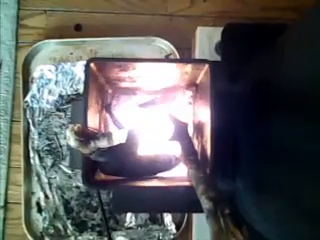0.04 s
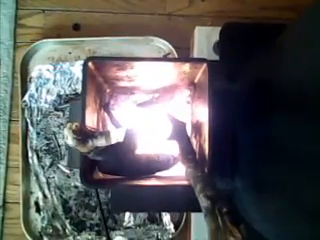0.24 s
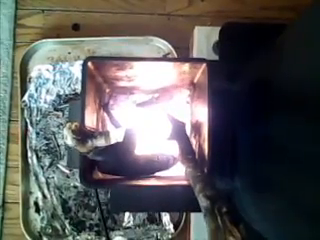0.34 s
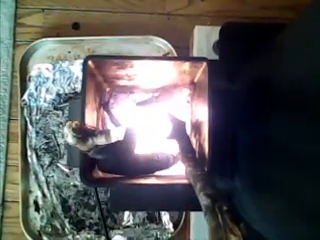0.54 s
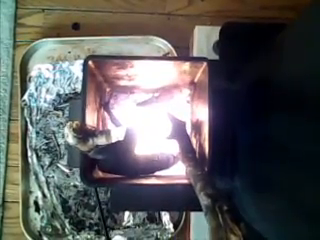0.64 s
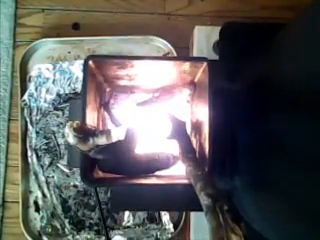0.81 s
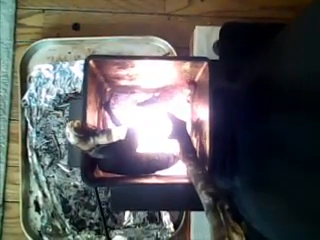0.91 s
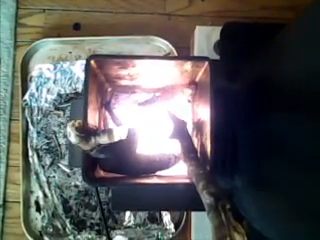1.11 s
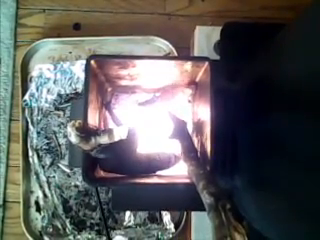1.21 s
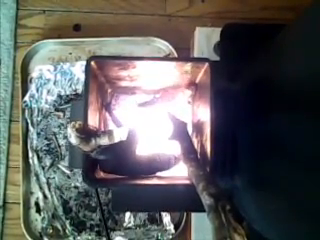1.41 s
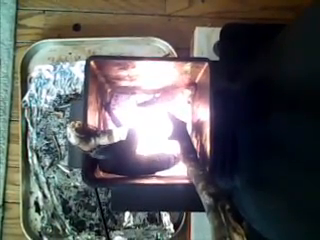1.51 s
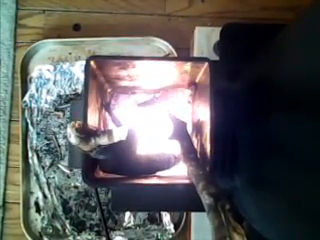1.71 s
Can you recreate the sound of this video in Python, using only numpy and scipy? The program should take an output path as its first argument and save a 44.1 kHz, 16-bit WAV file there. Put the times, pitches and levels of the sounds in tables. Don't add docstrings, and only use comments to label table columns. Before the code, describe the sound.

Close, mono, slightly dull microphone in a room: near silence with hiss, a click opens onto a rushing stove fire, two rattling plastic knocks follow quickly, then steady draft roar, a tiny spit and a soft thud.

```python
import sys
import numpy as np
from scipy import signal
from scipy.fft import rfft, irfft, next_fast_len
from scipy.io import wavfile
from scipy.ndimage import uniform_filter1d, map_coordinates

SR = 44100
rng = np.random.default_rng(int(sys.argv[2]) if len(sys.argv) > 2 else 0)


def gain_from_decibels(decibels):
    exponent = np.asarray(decibels, float) / 20
    return 10 ** exponent


def generate_wav(signal):
    frames = np.transpose(np.atleast_2d(signal))
    scaled = np.clip(frames, -1, 1) * 32767
    pcm = np.round(scaled).astype(np.int16)
    wavfile.write(sys.argv[1], SR, pcm)


N = 77175
T = np.arange(N) / SR
OPEN_S = 0.1795


def unit(x):
    return x / np.sqrt(np.mean(x ** 2) + 1e-20)


def filtered(x, response):
    m = next_fast_len(N + SR)
    return irfft(rfft(x, m) * response(np.fft.rfftfreq(m, 1 / SR)), m)[:N]


def wobble(rate):
    knots = rng.standard_normal(int(N * 60 / SR) + 4)
    return map_coordinates(knots, [T * min(rate, 59)])


def rush(colour, patchy_db):
    z = signal.stft(rng.standard_normal(N), nperseg=512)[2]
    field = uniform_filter1d(rng.standard_normal(z.shape), size=5, axis=0)
    field = uniform_filter1d(field, size=8, axis=1)
    noise = signal.istft(z * gain_from_decibels(patchy_db * unit(field)), nperseg=512)[1][:N]
    f, db = np.transpose(colour)

    def response(hz):
        return gain_from_decibels(np.interp(np.log(hz + 1), np.log(f + 1), db, left=-120, right=-120))
    return unit(filtered(noise, response))


def burst(s, rise, t60):
    u = np.clip(T - s, 0, None)
    return (1 - np.exp(-u / rise)) * gain_from_decibels(-60 * np.clip(u - rise, 0, None) / t60)


def ring(s, hz, db, t60, rise=0.0038):
    return gain_from_decibels(db) * burst(s, rise, t60) * np.sin(2 * np.pi * hz * (T - s))


def microphone_noise():
    # (frequency [Hz], density [dB per Hz])
    hiss_colour = [(70, -10), (160, 3.5), (400, -10.5), (1000, -4.5), (1600, -13.5), (9500, -16.5),
                   (11500, -18)]
    # (frequency [Hz], level [dB])
    whine_tones = [(4125, -79), (157, -84)]
    hiss = gain_from_decibels(-74) * rush(hiss_colour, patchy_db=.5)
    pulse_s = .069
    on = np.clip(3 * np.sin(2 * np.pi * (T - .007) / pulse_s) + .6, 0, 1)
    whine = sum(gain_from_decibels(db) * np.sin(2 * np.pi * hz * T) for hz, db in whine_tones)
    return hiss + on * whine


def opening_click():
    # (time after opening [s], frequency [Hz], level [dB], t60 [s])
    click_modes = [
        (0, -1000, -31, .03),
        (0, -700, -34, .02),
        (.004, -1080, -33, .025),
    ]
    rings = sum(ring(OPEN_S + s, *mode, rise=.0001) for s, *mode in click_modes)
    return rings - gain_from_decibels(-25) * burst(OPEN_S, .0002, .15)


def fan_tones():
    # (frequency [Hz], width [Hz], level [dB])
    fan_modes = [(79.6, 6.6, -11.5), (160.9, 19.5, -7), (190.7, 14.3, -13), (292.3, 7.2, -22.5),
                 (364.5, 6.9, -17.5), (562.2, 13.5, -15.5), (717, 19, -16), (1004.7, 28, -13),
                 (7500, 40, -38), (7500, 40, -36), (9290, 280, -26.5)]

    def tone(hz, width_hz):
        def response(f):
            peak = 1j * f * width_hz / (hz * hz - f * f + 1j * f * width_hz)
            return peak ** 2
        return unit(filtered(rng.standard_normal(N), response))
    return sum(gain_from_decibels(db) * tone(hz, width_hz) for hz, width_hz, db in fan_modes)


def draft_roar():
    # (time [s], level [dB])
    draft = [(.18, -39), (.45, -40.5), (.6, -43), (.9, -44), (1.2, -42.5), (1.5, -42), (1.62, -41.5),
             (1.69, -41), (1.75, -39.5)]
    # (frequency [Hz], density [dB per Hz])
    roar_colour = [(170, 2), (230, -1), (430, -4.5), (560, -1), (1050, -0.5), (1500, -7), (2300, -10.5),
                   (2800, -21.5), (3600, -49)]
    fizz_colour = [(2200, -39), (3000, 2), (3300, -2), (3800, 0), (4700, -2.5), (5300, -7), (8300, -7.5),
                   (9300, -7.5), (11500, -13)]
    rumble_colour = [(2.4, -14), (4.0, 18), (16, 6.5), (81, -9), (118, -3.5), (165, -3.5), (260, -25),
                     (340, -6), (570, -120)]
    draft_db = np.interp(T, *np.transpose(draft))
    flutter_db = .45 * wobble(9)
    roar = gain_from_decibels(flutter_db + .8 * wobble(35)) * rush(roar_colour, patchy_db=.9)
    fizz = gain_from_decibels(-17 + flutter_db) * rush(fizz_colour, patchy_db=-1.7)
    rumble_db = 4 - 1.26 * (draft_db - draft_db.mean()) + 1.4 * wobble(6.2)
    rumble = gain_from_decibels(rumble_db) * rush(rumble_colour, patchy_db=-1.16)
    return gain_from_decibels(draft_db) * (roar + fizz + rumble + fan_tones())


def flue_throb():
    # (time [s], pitch [Hz], level [dB], octave level [dB])
    flue = [(0.6, 79.6, -51.5, -59), (0.676, 80.0, -63, -67), (0.794, 80.05, -51.5, -46),
            (0.82, 79.8, -55, -66), (0.92, 79.4, -58, -56), (1.054, 80.96, -49, -61),
            (1.09, 81.13, -46.5, -42.5), (1.226, 83.05, -60, -54), (1.288, 82.6, -46.5, -80),
            (1.314, 81.44, -50.5, -56), (1.576, 78.3, -48, -52), (1.634, 75.04, -50.5, -59),
            (1.652, 75.1, -48, -46), (1.75, 74.7, -46.5, -66)]
    s, hz, db, octave_db = np.transpose(flue)
    phase = 2 * np.pi * np.cumsum(np.interp(T, s, hz)) / SR
    pitch = gain_from_decibels(np.interp(T, s, db)) * np.sin(phase)
    octave = gain_from_decibels(np.interp(T, s, octave_db)) * np.sin(2 * phase)
    return gain_from_decibels(8.5) * (pitch + octave)


def rattle(contacts, body_colour, bright_colour):
    body = sum(gain_from_decibels(db) * burst(s, rise, t60) for s, rise, db, _, t60 in contacts)
    bright = sum(gain_from_decibels(db) * burst(s, rise, 0.8 * t60) for s, rise, _, db, t60 in contacts)
    body = body * gain_from_decibels(1.1 * wobble(53.2)) * rush(body_colour, patchy_db=-1.0)
    return body + bright * rush(bright_colour, patchy_db=1.5)


def knocks():
    # (time [s], rise [s], body level [dB], bright level [dB], t60 [s])
    first = [
        (.2428, 0.00092, -49, -34.5, .12),
        (.2452, 0.0011, -31.5, -41, 0.095),
        (.255, 0.0038, -30, -43.5, 0.77),
        (0.282, 0.0026, -37, -59, .15),
    ]
    second = [
        (.371, 0.0027, -30, -43.5, 0.26),
        (.3785, 0.0023, -30, -47.5, 0.25),
    ]
    # (frequency [Hz], density [dB per Hz])
    first_body = [(110, -10), (200, -11.5), (350, 0.5), (480, -5), (1010, -1.5), (1600, -10), (2300, -12),
                  (3000, -25.5), (3800, -24)]
    first_bright = [(2500, -24), (3000, -3), (3500, -7.5), (3900, 2.5), (4800, -1.5), (5500, -9),
                    (8300, -8), (9500, -3.5), (11500, -15.5)]
    second_body = [(76, -31), (130, 2.5), (453, -25.5), (786, -5), (1260, -9.5), (1710, -12), (1870, -10),
                   (3000, -31.5), (3900, -67), (6600, -120)]
    second_bright = [(2300, -25), (3000, -5), (3800, -1), (6800, -5.5), (8600, 1), (11500, -10)]
    return rattle(first, first_body, first_bright) + rattle(second, second_body, second_bright)


def cracks():
    # (time [s], frequency [Hz], level [dB], t60 [s])
    crack_modes = [
        (.243, 3920, -39, 0.044),
        (.2445, 4650, -34.5, 0.049),
        (.249, 1465, -29, .06),
        (.3785, 1246, -28, .06),
        (.3785, 1110, -33, 0.049),
        (.383, 1853, -31.5, 0.061),
        (.381, 2144, -33.5, 0.058),
        (.742, 96, -34, 0.18),
    ]
    return sum(ring(*mode, rise=.0006) for mode in crack_modes)


def housing_ring():
    # (time [s], level [dB])
    blows = [
        (.252, 2),
        (0.377, -13),
    ]
    # (frequency [Hz], level [dB], t60 [s])
    housing = [(95, -23.5, 0.28), (218.1, -31, 0.212), (354, -31, 0.34), (394.2, -33.5, 0.27),
               (639, -40.5, 0.46), (1244, -44, 0.18), (3760, -50.5, 0.5), (4680, -47, 0.26),
               (7693, -49, 0.19)]
    return sum(ring(s, hz, db + level + rng.normal(0, 2), t60)
               for s, db in blows for hz, level, t60 in housing)


def stand_sway():
    # (time [s], frequency [Hz], negative = starts downward, level [dB], t60 [s])
    sways = [
        (0.253, 28, -16.5, 1.46),
        (0.263, -4.5, -17.5, 0.68),
        (0.39, -14, -7.5, 0.31),
        (.448, 16, -9, 0.53),
        (0.421, 31.5, -25, 1.16),
        (.72, 10, -19.5, 1),
    ]
    # (time [s], level [dB], build-up [s])
    shoves = [
        (.259, -14.5, 0.028),
        (0.384, -10.5, 0.017),
    ]
    let_go_s = 0.0071
    push = sum(gain_from_decibels(db) * np.exp(np.where(T < s, (T - s) / build, (s - T) / let_go_s))
               for s, db, build in shoves)
    return push + sum(ring(*mode, rise=0.0029) for mode in sways)


def ember_spit():
    # (time [s], level [dB], t60 [s])
    spit_event = (1.1034, -44, .008)
    # (frequency [Hz], density [dB per Hz])
    spit_colour = [(5200, -25), (6500, -7), (8000, -14), (9400, 0), (10800, -12)]
    s, db, t60 = spit_event
    return gain_from_decibels(db) * burst(s, .0004, t60) * rush(spit_colour, patchy_db=0)


def thud():
    # (time [s], frequency [Hz], level [dB], t60 [s])
    thud_mode = (1.676, 118, -26, .11)
    return ring(*thud_mode)


def scene():
    stove = draft_roar() + flue_throb() + ember_spit() + thud()
    handling = knocks() + cracks() + housing_ring() + stand_sway()
    return (opening_click() + stove + handling)[None]


def low_pass(x):
    return signal.sosfilt(signal.butter(12, 11370, fs=SR, output="sos"), x)


def record(dry):
    step_s, step_db = .4117, -6.5
    edge_hz, edge_db_per_khz = 10340, 19.5
    gain = (T >= OPEN_S) * np.where(T < step_s, 1, gain_from_decibels(step_db))

    def input_filter(hz):
        return gain_from_decibels(-edge_db_per_khz * np.clip(hz - edge_hz, 0, None) / 1000)
    heard = filtered(dry[0] * gain + microphone_noise(), input_filter)
    dc_offset = -.0036
    return low_pass(heard[None] + dc_offset)


dry = scene()
out = record(dry)
generate_wav(out)
```